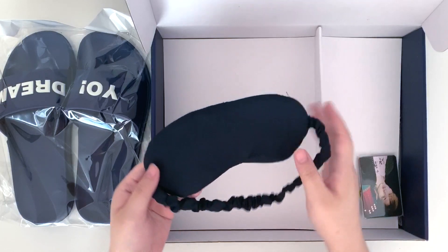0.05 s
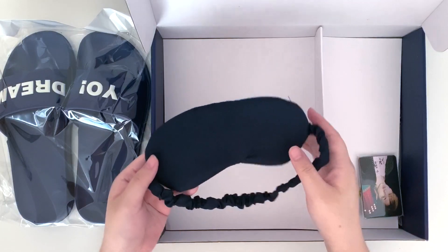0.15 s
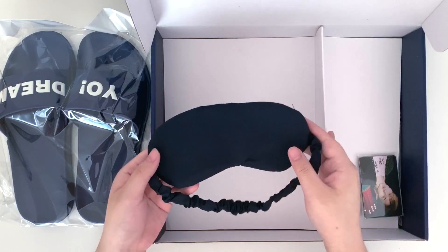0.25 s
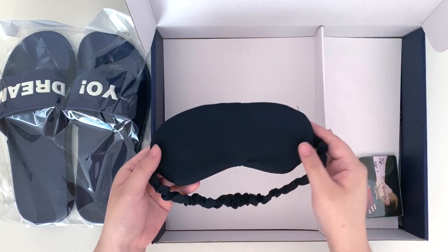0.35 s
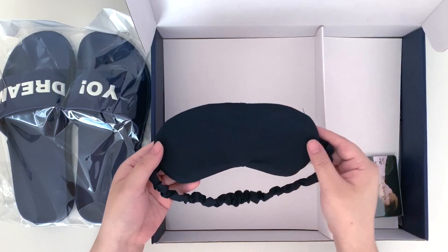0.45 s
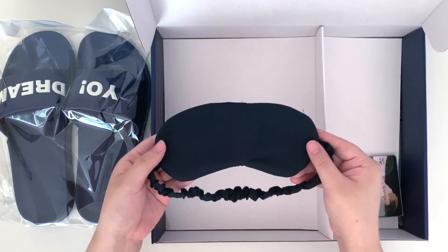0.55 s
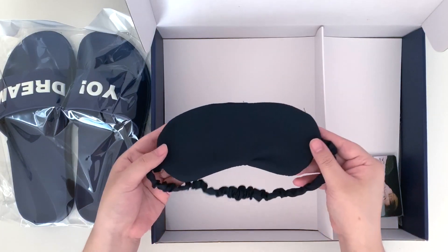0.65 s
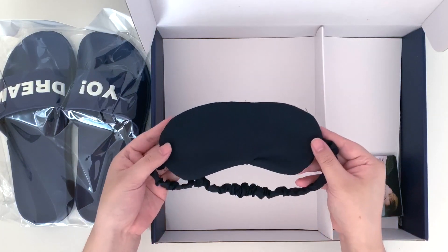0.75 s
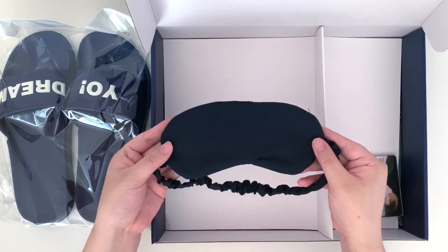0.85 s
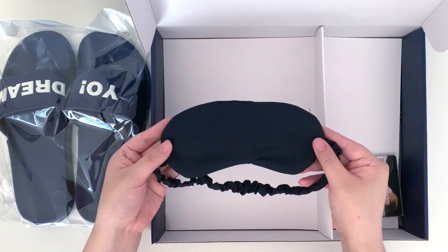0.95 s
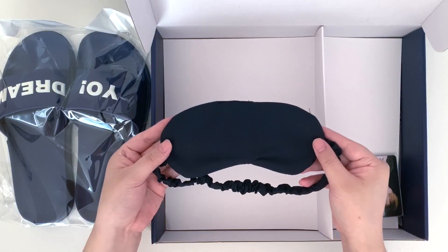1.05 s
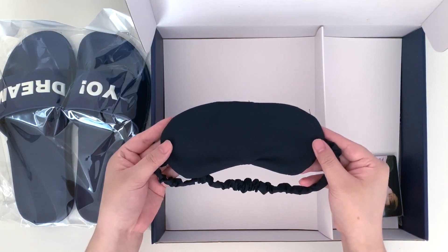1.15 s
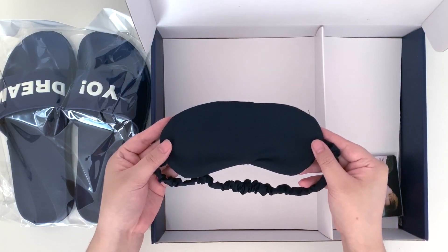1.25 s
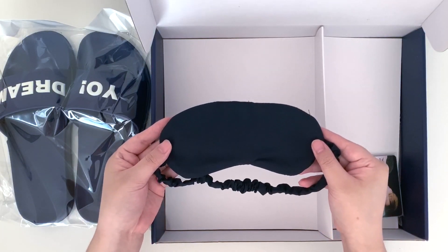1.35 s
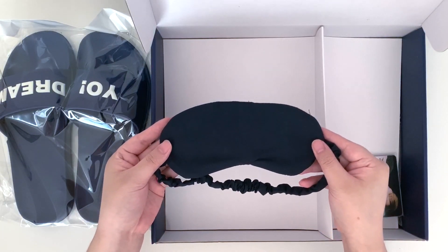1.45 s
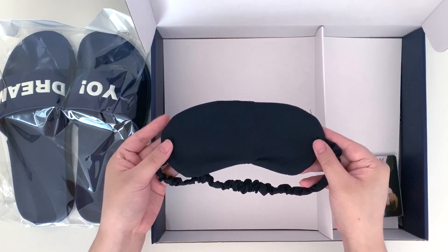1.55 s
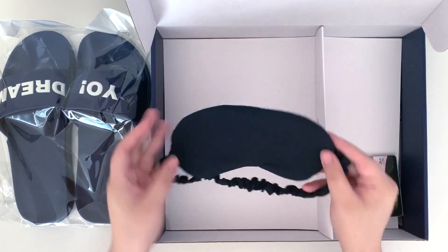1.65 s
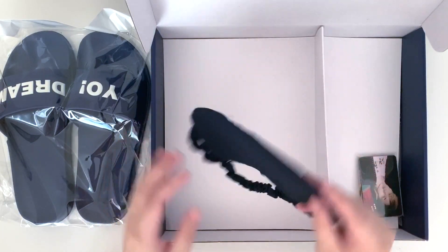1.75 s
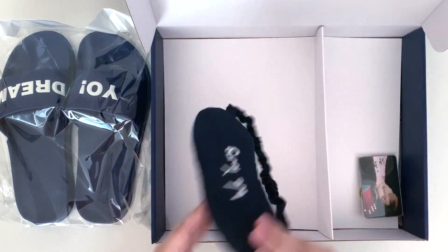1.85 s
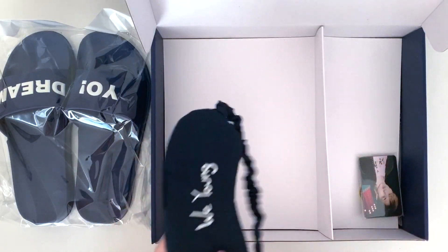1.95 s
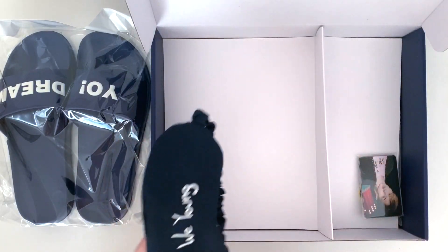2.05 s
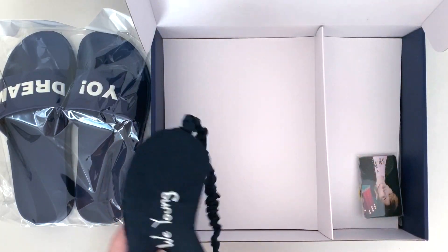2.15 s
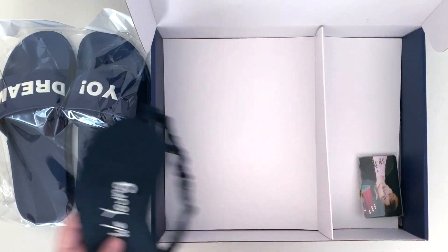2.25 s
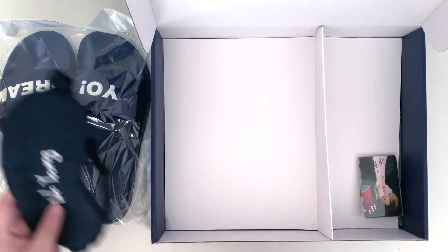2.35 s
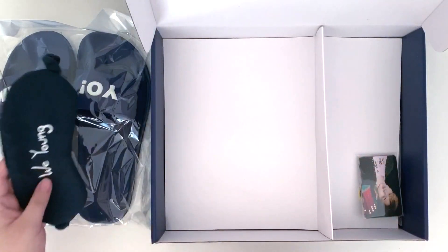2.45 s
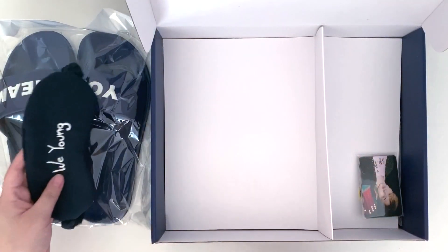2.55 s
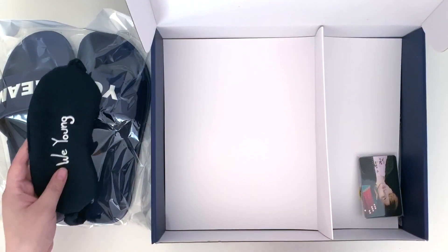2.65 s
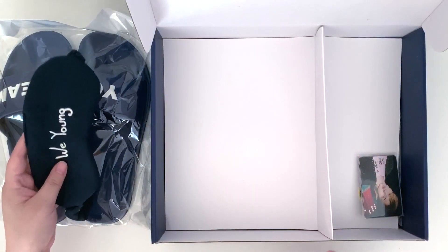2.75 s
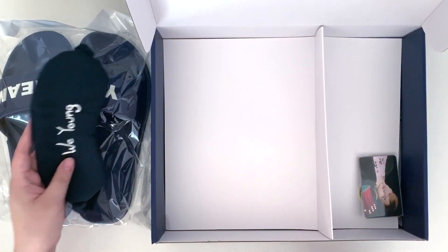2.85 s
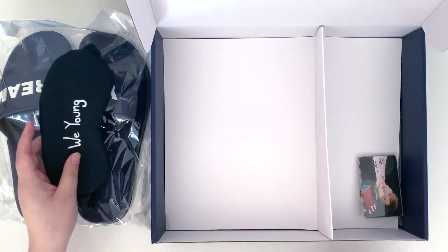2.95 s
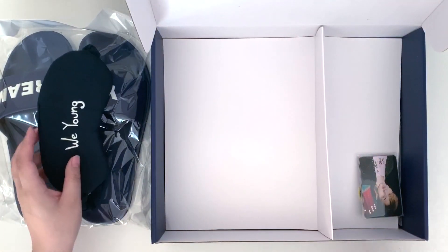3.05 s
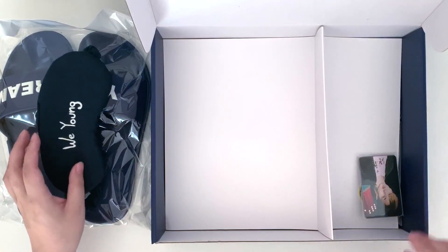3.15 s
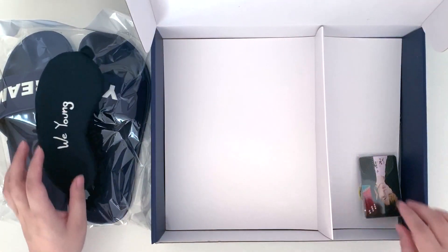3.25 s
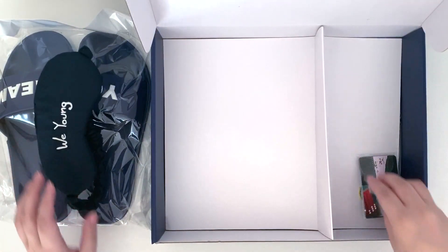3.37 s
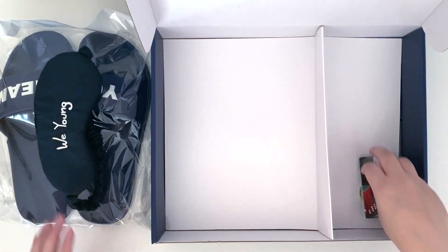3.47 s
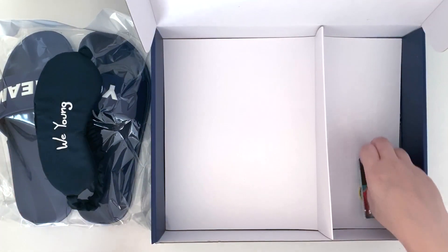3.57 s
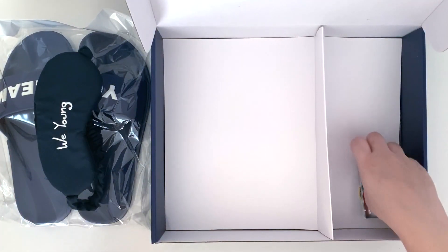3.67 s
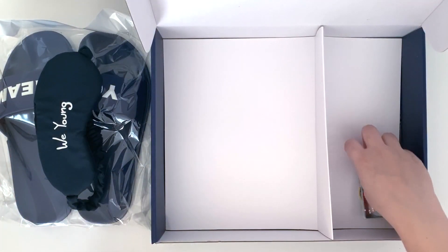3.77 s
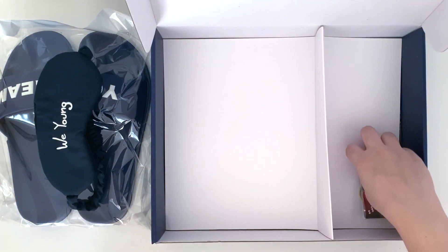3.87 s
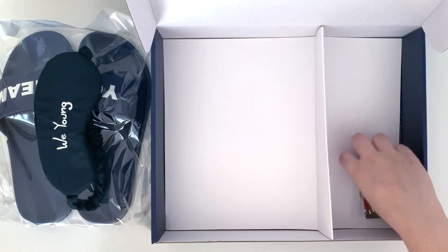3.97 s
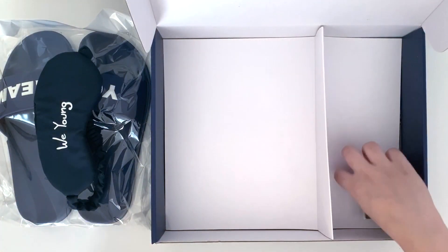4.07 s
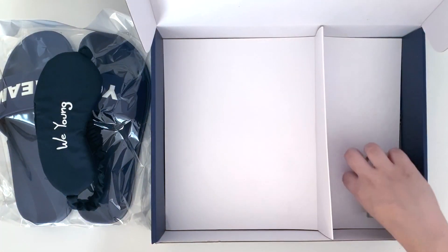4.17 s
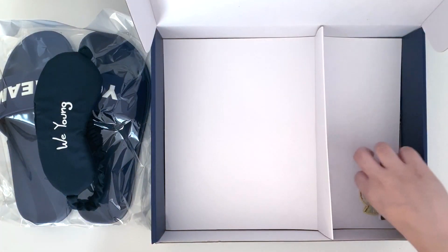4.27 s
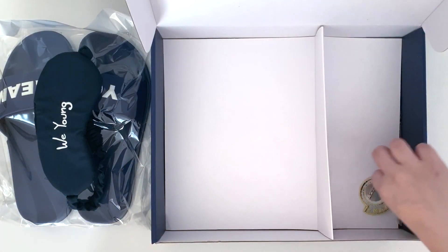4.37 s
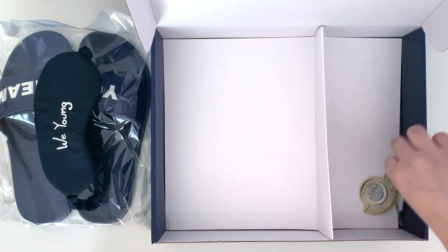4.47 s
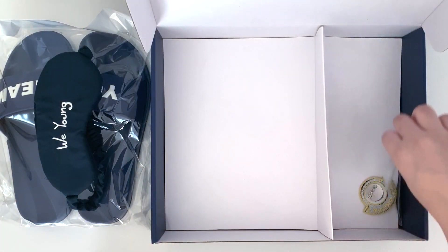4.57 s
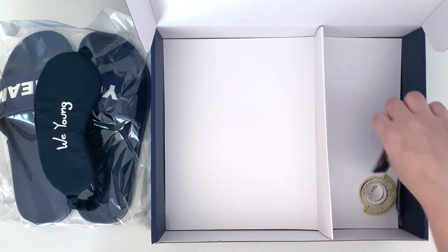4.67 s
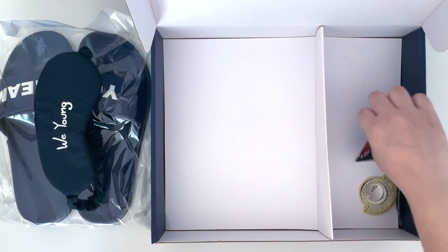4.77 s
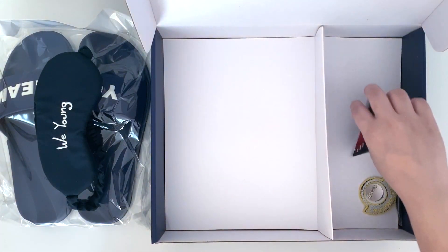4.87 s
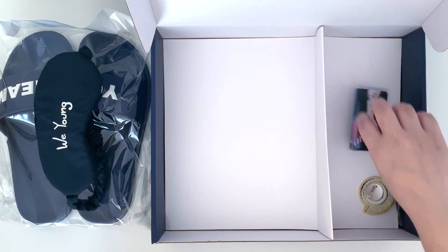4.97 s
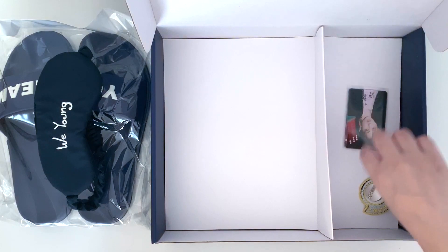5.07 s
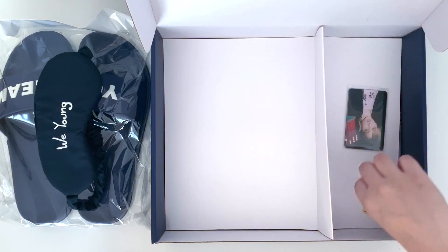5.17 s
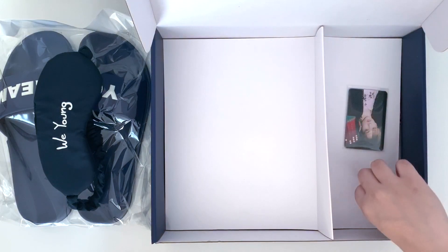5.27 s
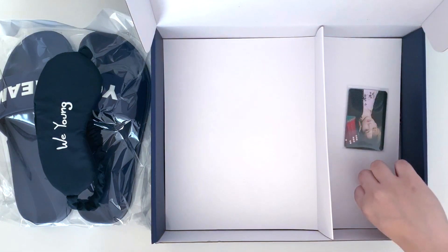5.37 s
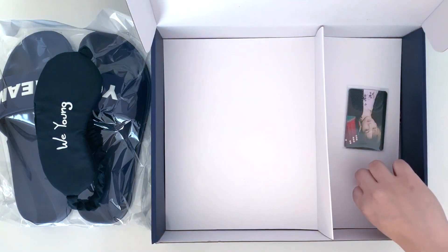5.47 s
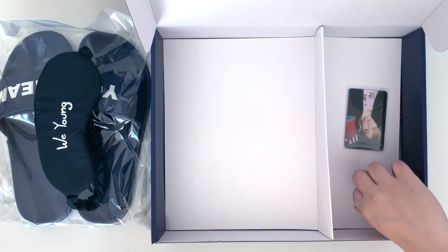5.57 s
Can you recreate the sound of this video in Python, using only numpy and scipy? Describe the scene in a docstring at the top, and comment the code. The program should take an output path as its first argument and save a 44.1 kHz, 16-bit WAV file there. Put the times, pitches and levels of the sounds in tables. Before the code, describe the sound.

Hollow cardboard knocks and faint satin rubbing, then plastic film crackles sharply, and a small pack scrapes, clicks and drops onto card.

```python
"""Knocks on a cardboard box and a whisper of satin come first, over low rumble and hiss: hands turn a
sleep mask over, lay it on a plastic bag that snaps and crinkles, then pick up a small pack and drop it.
Satin, film and card are shaped noise under level curves; blows ring decaying panel and table modes;
each crease is a few cycles of sine per band. A small room answers; the sound is close and band-limited."""
import sys
import numpy as np
from scipy import signal
from scipy.fft import rfft, irfft, next_fast_len
from scipy.io import wavfile
from scipy.ndimage import uniform_filter1d, map_coordinates

SR = 44100
rng = np.random.default_rng(int(sys.argv[2]) if len(sys.argv) > 2 else 0)


def master_out(mix):
    """Clip the mix to full scale and print it as 16-bit PCM to the path in sys.argv[1]."""
    frames = np.transpose(np.atleast_2d(mix))
    ceiling = np.clip(frames, -1, 1)
    pcm = np.round(ceiling * 32767).astype(np.int16)
    wavfile.write(sys.argv[1], SR, pcm)


N = 247821
T = np.arange(N) / SR


def amp(db):
    """Gain of a level in dB."""
    return 10 ** (np.asarray(db) / 20)


def unit(x):
    """x scaled to rms 1."""
    return x / np.sqrt(np.mean(x ** 2) + 1e-20)


def along(points, hz):
    """Interpolate (hz, value) points on a log frequency axis."""
    point_hz, value = np.transpose(points)
    return np.interp(np.log(hz + 1), np.log(point_hz + 1), value)


def filtered(x, response):
    """Multiply the spectrum of x by a response of frequency."""
    size = next_fast_len(N + SR // 4)
    hz = np.fft.rfftfreq(size, 1 / SR)
    return irfft(rfft(x, size) * response(hz), size)[..., :N]


def wobble(rate_hz):
    """Smooth random curve through rate_hz knots a second."""
    knots = rng.standard_normal(int(N * rate_hz / SR) + 4)
    return map_coordinates(knots, [T * rate_hz])


def rush(spectrum, grain_db, grain_rate_hz, streak_db):
    """Two unrelated coloured noises, rms 1: grains flutter them, brief narrow resonances streak them."""
    grains = rng.standard_normal((2, N)) * amp(grain_db * wobble(grain_rate_hz))
    z = signal.stft(grains, nperseg=256)[2]
    streaks = uniform_filter1d(rng.standard_normal(z.shape[1:]), size=2, axis=0)
    streaks = uniform_filter1d(streaks, size=16, axis=1)
    noise = signal.istft(z * amp(streak_db * unit(streaks)), nperseg=256)[1][:, :N]
    return unit(filtered(noise, lambda hz: amp(along(spectrum, hz))))


def stroke(rows):
    """Level curve and second curve of a rubbing contact, -200 dB outside its rows."""
    s, db, other_db = np.transpose(rows)
    return (np.interp(T, s, db, left=-200, right=-200),
            np.interp(T, s, other_db, left=-200, right=-200))


def bands(mid_db, presence):
    """Top, presence and mid dB re top: the duller the contact, the more presence."""
    offset_db, db_per_mid_db = presence
    return np.array([0, offset_db + db_per_mid_db * mid_db, mid_db])


SAG_DB = 5  # a contact eases off by this much while it holds


def bursts(rows, presence, slower):
    """Top, presence and mid envelopes of brief contacts; the lower bands die slower.

    Rows: start_s, top_db, mid_re_top_db, rise_s, hold_s, t60_s (top band)."""
    power, t = np.zeros((3, N + SR)), np.arange(SR // 3) / SR
    stretch = np.array([[1], [np.sqrt(slower)], [slower]])
    for s, db, mid_db, rise_s, hold_s, t60_s in rows:
        held = np.clip((t - rise_s) / hold_s, 0, 1)
        fade = np.maximum(t - rise_s - hold_s, 0) / (t60_s * stretch)
        level = amp(db + bands(mid_db, presence)[:, None] - SAG_DB * held - 60 * fade)
        attack = np.minimum(t / rise_s, 1) ** 2
        power[:, round(s * SR):][:, :len(t)] += (attack * level) ** 2
    return np.sqrt(power[:, :N])


# level of the low rumble: start_s, level_db
RUMBLE_LEVEL = [(0.0, -52), (0.08, -42.5), (0.27, -46), (0.4, -51.5), (0.8, -49), (1.0, -55), (1.33, -51.5),
                (1.88, -50), (2.08, -47), (2.43, -54.5), (2.49, -42), (2.75, -52), (2.97, -46.5),
                (3.58, -50.5), (4.01, -45.5), (4.12, -49.5), (4.18, -41), (4.41, -48.5), (4.96, -48),
                (5.08, -41.5), (5.24, -51), (5.62, -50)]
# rumble spectrum: freq_hz, density_db
RUMBLE_SPECTRUM = [(12, -49.5), (20, -55), (36, -11), (59, -1), (103, -16.5), (119, -15), (145, -20.5),
                   (178, -18), (216, -27.5), (266, -25), (323, -29.5), (358, -30.5), (700, -49.5),
                   (910, -66), (1540, -120)]
# hiss spectrum: freq_hz, density_db
HISS_SPECTRUM = [(240, -23), (400, -9.5), (467, -13.5), (708, -13), (801, -12.5), (1440, -21),
                 (1680, -19.5), (3160, -23.5), (6050, -26.5), (8760, -20), (16000, -23.5)]
HISS_DB = -70


def air():
    """Low noise in lumps for the rumble, near-steady noise for the hiss of the quiet room."""
    rumble_db = np.interp(T, *np.transpose(RUMBLE_LEVEL))
    rumble = amp(rumble_db) * rush(RUMBLE_SPECTRUM, grain_db=2.0, grain_rate_hz=12, streak_db=0.22)
    hiss = amp(HISS_DB) * rush(HISS_SPECTRUM, grain_db=0.15, grain_rate_hz=8, streak_db=0.8)
    return rumble + hiss


# decay of the room: freq_hz, t60_s
ROOM_DECAY = [(150, 0.54), (1000, 0.24), (4000, 0.28), (12000, 0.1)]


def room(x):
    """Each frequency of the room's answer dies at its own speed; the bass returns weakly."""
    hz, t, z = signal.stft(rng.standard_normal((2, SR // 2)), SR, nperseg=256)
    thin = (hz / np.hypot(hz, 600))[:, None] ** 2
    decay = amp(-60 * t / along(ROOM_DECAY, hz)[:, None])
    tail = signal.istft(thin * z * decay, SR, nperseg=256)[1]
    delayed = np.pad(x, ((0, 0), (200, 0)))  # samples
    return signal.fftconvolve(delayed, tail / np.linalg.norm(tail[0]), axes=1)[:, :N]


def ring(modes, colour_db, swell_s):
    """Decaying modes, new strengths and phases for each blow and path, swelling over the blow."""
    hz, db, t60_s = np.transpose(modes)[:, :, None, None]
    t = np.arange(round(t60_s.max() * SR)) / SR
    luck = rng.standard_normal((len(modes), 2, 2))
    strength = amp(2.2 * luck[..., :1])
    waves = strength * np.sin(2 * np.pi * (hz * t + 0.15 * luck[..., 1:]))
    fade = amp(db + colour_db(hz) - 60 * t / t60_s)
    return (fade * waves).sum(0) * (1 - np.exp(-t / swell_s))


# blows on the box: start_s, floor_panel_db, walls_re_floor_db, upper_modes_re_floor_db
BLOWS = [(0.063, -31, -19.5, -15), (0.084, -35, -11, -6), (0.196, -41, -43, -19), (0.214, -43.5, -35, -22),
         (0.46, -40, -18, -29), (0.491, -52, -9, -25), (1.317, -57.5, -22, -17), (2.024, -50.5, -15, -12),
         (2.349, -50, -13.5, -1), (2.455, -37, -12, 4.5), (2.462, -30.5, -12, 0.5), (2.854, -52, 0.5, 14),
         (2.942, -33.5, -11, 6.5), (2.984, -37, -5, 0.5), (3.224, -30.5, -10.5, -11),
         (3.301, -51.5, -10, -14), (3.668, -37.5, -1.5, -2.5), (3.906, -55, 2.5, 10),
         (4.022, -46.5, 5.5, -2), (4.168, -30.5, 0, -1), (4.177, -27, -8, -11), (4.247, -36.5, -13, -1.5),
         (4.463, -47.5, -6.5, -5.5), (4.689, -33.5, -13, -10.5), (4.813, -40, -9.5, -11),
         (5.008, -44, 14, -9), (5.023, -26, 2.5, 5), (5.034, -23, -12, -4.5), (5.055, -32.5, -3.5, 0.5),
         (5.408, -58, -5, 4), (5.542, -41.5, -11, -27)]
# cardboard panel modes: freq_hz, level_db, t60_s
PANEL_MODES = [(139.6, -4.5, 0.1), (206, -0.5, 0.12), (244.7, -1, 0.095), (325.6, -8.5, 0.2),
               (383, 3.5, 0.11), (429, -7.5, 0.12), (578, -11, 0.12), (655, -14.5, 0.1), (777, -9.5, 0.086),
               (964, -3.5, 0.058), (1036, -8, 0.068), (1190, -8, 0.052), (1223, -11.5, 0.067),
               (1360, -6, 0.038), (1528, -8.5, 0.072), (1733, -14.5, 0.07), (1950, -16, .07),
               (2370, -16, 0.039)]
# table top modes: freq_hz, level_db, t60_s
TABLE_MODES = [(60.74, -7.5, 0.74), (84, 1, 0.23)]
BLOW_S = 0.0025  # swell time constant on the panels
THUD_DB, THUD_DB_PER_DB = -43, 0.51  # table thud for a -40 dB blow; growth per dB of blow


def box():
    """Each blow rings the cardboard panels, some more than others, and thuds into the table."""
    out = np.zeros((2, N + SR))
    for s, db, wall_db, upper_db in BLOWS:
        thud_db = THUD_DB + THUD_DB_PER_DB * (db + 40)
        colour = [(250, db), (330, db + wall_db), (450, db + wall_db), (580, db + upper_db)]  # hz, db
        panels = ring(PANEL_MODES, lambda hz: along(colour, hz), BLOW_S)
        thud = ring(TABLE_MODES, lambda hz: thud_db, 2 * BLOW_S)
        for sound in (panels, thud):
            out[:, round(s * SR):][:, :sound.shape[1]] += sound
    return out[:, :N]


# pack and fingers dragging on card: start_s, treble_db, mid_re_treble_db
CARD_DRAG = [(3.7, -83, -8), (4.154, -71.5, 10), (4.506, -79, -12), (4.762, -74.5, -2.5),
             (4.87, -53.5, -8.5), (4.922, -54, -15), (5.066, -55, -5), (5.11, -99, -12), (5.388, -77, 3),
             (5.62, -75, -20)]
# scuffs of nail and pack on card: start_s, top_db, mid_re_top_db, rise_s, hold_s
CARD_SCUFFS = [(0.06, -58.5, 6, .002, 0.0062), (0.077, -63, 14, 0.0017, 0.0056),
               (.212, -55.5, -7, 0.0016, 0.005), (0.5, -52.5, -13, .0025, .014),
               (3.665, -64.5, 14, 0.0029, 0.0085), (3.779, -47.5, -12.5, .0006, 0.019),
               (3.908, -63, 8.5, 0.00067, 0.0034), (3.948, -79, 17, 0.0014, 0.0027),
               (3.991, -39.5, -26, 0.0023, 0.0045), (4.013, -46, -5, 0.004, 0.017),
               (4.051, -54, -9, 0.014, 0.045), (4.124, -47.5, -8, 0.0071, 0.017),
               (4.138, -38, -5.5, 0.026, .004), (4.164, -52.5, 10.5, .002, 0.0065),
               (4.203, -50.5, 1.5, 0.004, 0.014), (4.239, -41.5, -12, 0.00081, 0.0033),
               (4.391, -60.5, -4, .0018, 0.023), (4.436, -46.5, -17, 0.0023, 0.034),
               (4.636, -61.5, -24, 0.024, 0.0097), (4.688, -47.5, -13.5, .0008, 0.013),
               (4.702, -52, -2, 0.012, 0.016), (4.809, -32.5, -23.5, 0.0022, 0.024),
               (4.9, -51, -6.5, 0.012, 0.0098), (4.934, -42, -32, .004, 0.014),
               (5.006, -33.5, 4.5, 0.00056, 0.0037), (5.02, -28.5, -11, .004, 0.0065),
               (5.028, -38.5, 5.5, 0.0016, 0.0064), (5.384, -63.5, 4.5, 0.014, 0.029),
               (5.528, -54.5, -4, 0.0079, 0.032)]
# card spectra, top, presence and mid: freq_hz, density_db
CARD_TOP_SPECTRUM = [(4710, -43), (8000, -4.5), (9800, -0.5), (10700, -2), (15000, -4.5), (16100, -20),
                     (16300, -61)]
CARD_PRESENCE_SPECTRUM = [(2060, -67), (3500, -18), (4440, -7), (5370, -6.5), (6970, -1.5), (8000, -2),
                          (10400, -18), (17600, -120)]
CARD_MID_SPECTRUM = [(350, -36), (600, -1.5), (824, -12), (991, -7.5), (1120, -18), (1750, -8),
                     (3500, -17.5), (4550, -18), (7700, -120)]
# presence band of a scuff: re_top_db, db_per_mid_db
SCUFF_BAND = (-2, 0.35)
SCUFF_T60_S, SCUFF_T60_PER_HOLD = 0.032, 1.64  # briefest fade; s of fade added per s of hold


def pack():
    """Nails and the pack's edge hiss over the card floor, in short scuffs and a faint drag."""
    db, mid_db = stroke(CARD_DRAG)
    drag = amp([db, db - 4.5, db + mid_db])
    scuff_rows = [(*row, SCUFF_T60_S + SCUFF_T60_PER_HOLD * row[-1]) for row in CARD_SCUFFS]
    scuffs = bursts(scuff_rows, SCUFF_BAND, slower=3.4)
    top, presence, mid = np.hypot(scuffs, drag)
    card = top * rush(CARD_TOP_SPECTRUM, grain_db=1.8, grain_rate_hz=300, streak_db=2.2)
    card += presence * rush(CARD_PRESENCE_SPECTRUM, grain_db=1.8, grain_rate_hz=300, streak_db=2.2)
    card += mid * rush(CARD_MID_SPECTRUM, grain_db=1.5, grain_rate_hz=180, streak_db=3.0)
    return card


# fingers sliding on satin: start_s, treble_db, mid_re_treble_db
SATIN_STROKES = [(0.0, -72, -1.5), (0.13, -73.5, -5), (0.29, -64, -5), (0.33, -78, -21), (0.44, -68.5, -1),
                 (0.49, -71, -6), (0.51, -62, 0), (0.61, -57, -7.5), (0.65, -63.5, -2), (0.83, -63.5, -6),
                 (0.87, -72.5, -7), (1.12, -76, -7), (1.54, -87.5, -2), (1.63, -51, -8.5),
                 (1.70, -53.5, -11.5), (1.73, -61.5, -13), (1.76, -55.5, -11.5), (1.81, -61.5, -14),
                 (1.85, -55, -11.5), (1.89, -66.5, 2.5), (1.92, -59, -5), (1.96, -69, -4), (2.04, -69, 0.5),
                 (2.17, -50.5, -6.5), (2.26, -59, -5.5), (2.32, -69.5, 2.5), (2.44, -67, -1)]
# satin spectra, treble and mid: freq_hz, density_db
SATIN_TREBLE_SPECTRUM = [(2060, -15), (3500, -7.5), (4210, -4.5), (5670, -4), (7510, 1.5), (9200, -1),
                         (11000, -1), (15200, -4.5), (16000, -41)]
SATIN_MID_SPECTRUM = [(530, -10), (900, -11.5), (1060, -12), (1290, -6.5), (1650, -6.5), (2050, -0.5),
                      (3390, -9), (4500, -8.5), (5850, -26), (9900, -120)]


def mask():
    """Satin whispers smoothly under the fingertips: two noise bands follow the sliding."""
    db, mid_db = stroke(SATIN_STROKES)
    treble = rush(SATIN_TREBLE_SPECTRUM, grain_db=1.5, grain_rate_hz=270, streak_db=2.0)
    mid = rush(SATIN_MID_SPECTRUM, grain_db=1.5, grain_rate_hz=40, streak_db=1.8)
    return amp(db) * treble + amp(db + mid_db) * mid


# creases of the bag flipping: start_s, top_db, mid_re_top_db
CREASES = [(2.3474, -56, 7.5), (2.447, -55, 15), (2.4567, -34, 10.5), (2.4666, -26.5, -1),
           (2.4735, -23.5, -18), (2.579, -59.5, 18), (2.671, -50, 12), (2.6902, -57.5, 15),
           (2.8364, -58.5, 22.5), (2.855, -28.5, 3), (2.8847, -47, -8), (2.928, -35.5, 7.5),
           (2.939, -29.5, -5), (2.9468, -16, -6.5), (2.9854, -19.5, -5.5), (3.1122, -36.5, 6.5),
           (3.17, -48, 4), (3.2196, -16.5, -13), (3.2256, -28.5, 7), (3.3033, -34.5, 11)]
# a crease flicking over, top, presence and mid band: freq_hz, t60_s
CREASE_FLICK = [(11000, .0025), (5200, .004), (2000, .009)]
# presence band of a crease: re_top_db, db_per_mid_db
CREASE_BAND = (-3, 0.49)
CRACK_DB, ECHO_DB = -0.5, -14  # re crease level: its crack, the strongest neighbour


def cracks(count):
    """A crease flips in a few cycles per band, at a new pitch each time; weaker neighbours follow."""
    out, t = np.zeros((2, N)), np.arange(SR // 60) / SR
    hz, t60_s = np.transpose(CREASE_FLICK)[:, :, None, None]
    for s, db, mid_db in CREASES:
        band_db = db + bands(mid_db, CREASE_BAND)[:, None, None]
        for k in range(count):
            wait, weak = rng.random(2)
            late_s, own_db = 0.003 + 0.02 * wait ** 2, ECHO_DB - 8 * weak - 6 * wait
            if k == 0:  # the crease itself
                late_s, own_db = 0.0012, CRACK_DB
            pitch_hz = hz * np.exp(0.22 * rng.standard_normal((3, 2, 1)))
            flick = amp(band_db + own_db - 60 * t / t60_s) * np.sin(2 * np.pi * pitch_hz * t)
            out[:, round((s + late_s) * SR):][:, :len(t)] += flick.sum(0)
    return out


# the bag settling under the mask: start_s, treble_db, mid_db
BAG_CRINKLE = [(2.44, -63, -65), (2.534, -60, -54.5), (2.664, -69, -70), (2.81, -78, -81),
               (2.853, -64, -52), (2.9, -61, -60.5), (2.93, -52.5, -45.5), (3.094, -61, -69),
               (3.174, -59.5, -65), (3.306, -58, -51), (3.356, -98, -90)]
# film spectra, top, presence and mid: freq_hz, density_db
FILM_TOP_SPECTRUM = [(4710, -11.5), (8000, -4.5), (10700, -4), (15200, -9.5), (16100, -23), (16600, -60)]
FILM_PRESENCE_SPECTRUM = [(2060, -38), (3500, 0), (4160, 5.5), (5530, -0.5), (6260, 3.5), (7010, -3),
                          (8000, -20), (10400, -36), (17600, -120)]
FILM_MID_SPECTRUM = [(290, -7), (500, -7), (584, -16), (715, -11), (1020, -0.5), (1260, -2), (1510, -10),
                     (2530, -7.5), (3500, -21), (4550, -13.5), (7700, -120)]
FIZZ_DB, TAIL_DB, TAIL_T60_S = -10.5, -11.5, 0.046  # re crease level: fizz around it, trailing rustle


def bag():
    """Creases crack within a short rustle that trails away, over tiny crinkles."""
    fizz_rows = [(s, db + FIZZ_DB, mid_db, 0.001, 0.0005, 0.018) for s, db, mid_db in CREASES]
    tail_rows = [(s - 0.003, db + TAIL_DB, mid_db, 0.006, 0.002, TAIL_T60_S) for s, db, mid_db in CREASES]
    fizz = bursts(fizz_rows, CREASE_BAND, slower=5.6)
    tails = bursts(tail_rows, CREASE_BAND, slower=1.3)
    db, mid_db = stroke(BAG_CRINKLE)
    crinkle = amp([db, db - 6.5, mid_db])
    top, presence, mid = np.sqrt(fizz ** 2 + tails ** 2 + crinkle ** 2)
    film = cracks(count=5)
    film += top * rush(FILM_TOP_SPECTRUM, grain_db=1.5, grain_rate_hz=640, streak_db=3.0)
    film += presence * rush(FILM_PRESENCE_SPECTRUM, grain_db=0.5, grain_rate_hz=580, streak_db=2.0)
    film += mid * rush(FILM_MID_SPECTRUM, grain_db=2.0, grain_rate_hz=380, streak_db=4.0)
    film[1] += 0.11 * film[0]  # the bag lies to the left
    return film


# side weighting: freq_hz, side_re_mid_db
SIDE_WEIGHT = [(60, -15.5), (92, -13), (140, -8.5), (210, -9.5), (330, -9.5), (500, -1.5), (770, 0.5),
               (1170, -1), (1790, -2), (2740, 1.5), (4190, -1.5), (6410, 1), (9800, -4), (12000, -27.5),
               (15500, -39)]
ROOM_DB = -10.5
LAG_S, LAG_SHARE = 0.00023, 0.5  # the left port hears part of the sound later


def scene():
    """Two unrelated paths of the same events become mid and side, the side weighted by frequency."""
    near = box() + pack() + mask() + bag()
    mid, loose = near + amp(ROOM_DB) * room(near) + air()
    late = filtered(mid, lambda hz: -1j * np.sin(np.pi * np.minimum(hz * LAG_S, 0.5)))
    side = np.sqrt(1 - LAG_SHARE ** 2) * loose + LAG_SHARE * late
    side = filtered(side, lambda hz: amp(along(SIDE_WEIGHT, hz)))
    return np.array([mid + side, mid - side])


BASS_HZ, TOP_HZ = 42, 16800


def record(dry):
    """The deepest bass is rolled off; the sound is band-limited at TOP_HZ."""
    return filtered(dry, lambda hz: (hz < TOP_HZ) * hz ** 4 / np.hypot(hz ** 4, BASS_HZ ** 4))


dry = scene()
out = record(dry)
master_out(out)
```